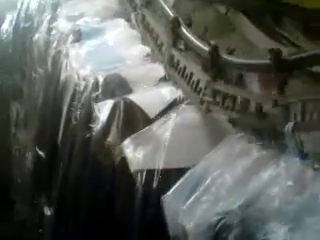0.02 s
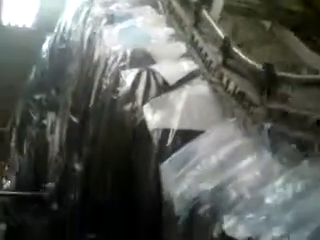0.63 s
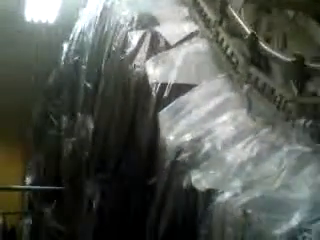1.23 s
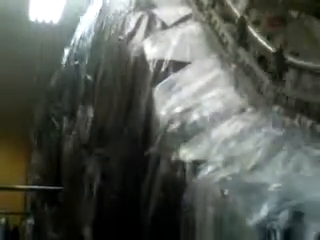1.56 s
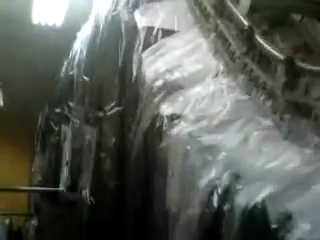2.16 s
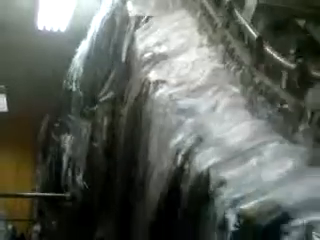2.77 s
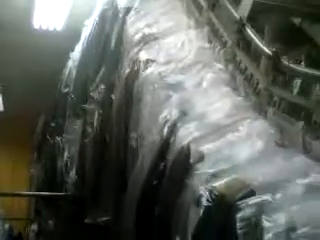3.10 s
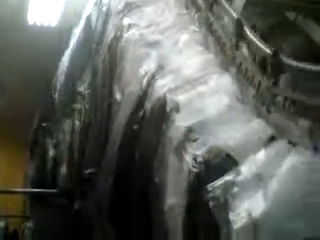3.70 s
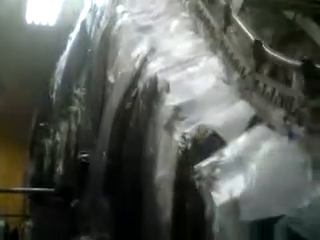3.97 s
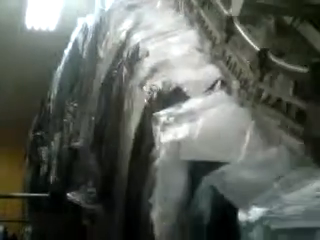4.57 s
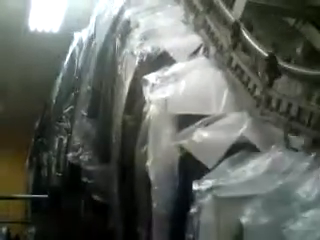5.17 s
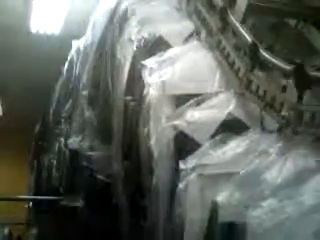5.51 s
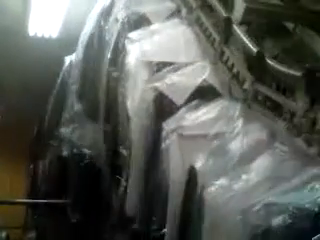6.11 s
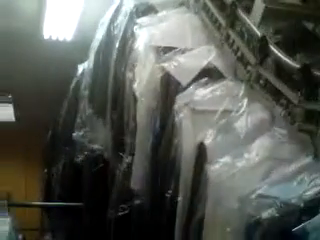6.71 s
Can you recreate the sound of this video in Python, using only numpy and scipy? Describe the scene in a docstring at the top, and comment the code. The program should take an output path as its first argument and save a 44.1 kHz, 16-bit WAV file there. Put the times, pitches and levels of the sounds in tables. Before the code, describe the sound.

A fan drones softly in a shop as the motor of a clothes conveyor kicks in with a brief squeal and clack. It settles into a steady low hum under the rumble and hiss of rollers, with recurring metal clatter, light hanger clicks and crinkling plastic covers, all with little echo. Late on, a sharp click comes, the motor cuts out and the rolling begins to fade.

```python
"""An overhead garment conveyor in a shop; a fan drones throughout. At 0.14 s the motor starts on a mains
hum; its drive slips with a short squeal and clacks. From 0.54 s rollers rumble, hiss and sing along the
rail, a chain joint clatters by every 0.7 s, hangers click and plastic covers rustle.
At 4.4 s the load eases. Near 6 s the motor is switched off and the chain coasts."""
import sys
import numpy as np
from scipy import signal
from scipy.fft import rfft, irfft, next_fast_len
from scipy.io import wavfile

SR = 44100
rng = np.random.default_rng(int(sys.argv[2]) if len(sys.argv) > 2 else 0)


def dump_mix(stems):
    """Bounce the given channels to the path in sys.argv[1] as a 16-bit WAV at rate SR."""
    frames = np.atleast_2d(stems).T  # one column per channel
    limited = np.clip(frames, -1, 1)  # hard clip at full scale
    pcm = np.round(limited * 32767).astype(np.int16)
    wavfile.write(sys.argv[1], SR, pcm)


N = 306054
TIME_S = np.arange(N) / SR
START_S, MOVING_S, EASE_S, OFF_S, COAST_S = 0.14, 0.54, 4.38, 6.02, 6.14

# fan drone: time_s, relative_db
FAN_LEVEL = [(0.0, -53), (0.11, -55.5), (0.135, -37.5), (0.33, -47.5), (0.58, -55), (0.89, -45),
             (1.41, -57.5), (2.55, -41.5), (3.01, -68), (3.09, -57), (3.36, -59), (3.86, -38.5),
             (4.56, -60), (4.62, -45.5), (5.97, -45.5), (6.57, -55), (6.78, -45.5), (6.94, -50)]
# mains hum: harmonic, relative_db
HUM_HARMONICS = [(1, 4), (2, -20), (3, -40.5)]
# brief dips of the hum: centre_s, gain_db, width_s
HUM_DIPS = [(0.345, -20, .02), (0.776, -4, 0.019), (1.13, -3.5, 0.067), (2.332, -1.5, .05),
            (2.596, -0.7, .18)]
# motor housing resonances: pitch_hz, width_hz, re_hum_db
HOUSING_MODES = [(107, 20, -17), (160, 32, -20.5), (274, 55, -25), (332, 10, -22.5), (460, 76, -33)]
# rustle of the covers: time_s, relative_db
RUSTLE_LEVEL = [(0.45, -50), (0.63, -48), (1.01, -44), (1.68, -43.5), (2.17, -45), (3.12, -45),
                (3.48, -46.5), (3.85, -45), (4.75, -46.5), (4.95, -48), (6.03, -45.5), (6.85, -61),
                (6.94, -61)]
# single crinkles: start_s, peak_db, pitch_hz
COVER_CRINKLES = [(.636, -32.5, 4600), (.941, -36, 5000), (1.387, -39, 5030), (1.421, -36, 5200),
                  (1.557, -23, 4600), (1.629, -24, 4850), (1.652, -27, 5400), (1.666, -24, 4500),
                  (1.678, -22, 4400), (1.773, -37, 4800), (1.79, -24, 4750), (1.8378, -23, 4700),
                  (3.372, -30.5, 5500), (3.461, -23, 5600), (4.975, -25, 4970)]
# low thumps, the first two as the motor kicks in, later ones from the swinging load: start_s, level_db
LOW_THUMPS = [(0.128, -42), (.2, -39.5), (5.629, -39.5), (5.924, -41), (5.965, -43), (6.749, -50)]
# hanger resonances: pitch_hz, relative_db
HANGER_MODES = [(1700, -1), (2050, -8.5), (2280, -7), (2420, -11), (2700, -4), (2950, -3.5), (3230, 0),
                (3390, -5.5), (3620, -1.5), (3810, -17.5), (4160, 5.5), (4570, -3), (4950, 3.5),
                (5300, -1.5), (5750, -2), (6200, 0.5), (6700, 4.5)]
# clicks of hangers, hooks, drive and chain joints: start_s, peak_db, pitch_hz, spread_octaves, t60_s
SHARP_CLICKS = [(0.023, -34.5, 3230, 0.11, .035), (.1245, -23.5, 2550, 0.2, 0.048),
                (0.3748, -16.5, 2220, 0.24, .037), (0.616, -30, 2040, 0.34, 0.033),
                (.764, -25.5, 2200, 0.56, 0.022), (.805, -30, 2330, 0.35, .03),
                (.866, -27.5, 2270, 0.17, .05), (.897, -29, 2400, .2, 0.064), (1.0, -21, 2200, 0.2, 0.075),
                (1.0975, -16, 3470, 0.49, 0.016), (1.164, -26, 3300, 0.22, 0.016),
                (1.2285, -25, 2980, 0.42, 0.01), (1.415, -24.5, 2170, 0.37, 0.054),
                (1.664, -20.5, 2210, 0.45, .025), (1.974, -33, 2680, 0.17, 0.046),
                (2.3755, -23, 2100, 0.55, 0.026), (2.465, -31, 2280, 0.12, 0.026),
                (3.799, -27, 2300, .15, 0.027), (4.724, -28, 1690, 0.52, 0.039),
                (5.2528, -27, 3220, 0.05, 0.042), (5.973, -13, 2950, 0.27, 0.033),
                (6.647, -30, 2220, 0.099, 0.024), (6.694, -35, 2630, 0.59, .03),
                (6.757, -23, 3504, 0.049, 0.033), (6.873, -37, 2060, 0.25, .04)]
# singing rollers: peak_s, level_db, length_s, pitch_hz, rough_share
ROLLER_GROANS = [(0.03, -47.5, 0.12, 1390, 0.06), (0.05, -49, 0.044, 2060, 0.2),
                 (0.8, -48.5, 0.34, 394, 0.2), (1.259, -40.5, 0.084, 442, 0.17),
                 (1.49, -43.5, 0.11, 1960, 0.2), (1.873, -42, 0.051, 1780, 0.3),
                 (2.216, -44, 0.09, 2240, 0.59), (2.252, -48, 0.3, 444, 0.1), (2.271, -42, 0.096, 1753, 0),
                 (2.636, -44, 0.06, 1720, 0.5), (2.736, -43, 0.13, 1774, 0.33),
                 (2.98, -45, 0.097, 1323, 0.7), (3.06, -39, 0.08, 1788, 0.3), (3.343, -45, 0.12, 1398, 0.4),
                 (3.662, -42.5, 0.14, 1746, 0.6), (3.793, -39, 0.13, 1800, 0.5),
                 (4.02, -46.5, 0.47, 441, 0.2), (4.268, -40.5, 0.17, 445, 0.12),
                 (4.269, -40, .06, 1765, .6), (5.162, -43, 0.027, 1286, 0.3), (5.65, -49, 0.098, 1400, 0.6),
                 (6.163, -40.5, 0.046, 1990, .7), (6.363, -49.5, 0.039, 1533, 0.2),
                 (6.435, -46, 0.073, 2030, 0.6), (6.81, -55.5, 0.21, 397, .2)]
# rail resonances: pitch_hz, width_hz, relative_db
RAIL_MODES = [(322, 39, -19), (701, 27, -20), (1060, 20, -28.5), (1302, 26, -17), (1460, 32, -28),
              (1552, 21, -16.5), (1762, 23, -17), (1977, 15, -14.5), (2114, 15, -15), (2387, 36, -17.5),
              (2610, 17, -18.5), (2872, 37, -24)]
# chain guide resonances: pitch_hz, relative_db, t60_s
GUIDE_MODES = [(733, -16, 0.27), (1086, -7, 0.12), (1382, -14.5, 0.12), (1482, -10, 0.089),
               (1750, -9, 0.23), (2127, -5.5, 0.088), (2467, -6, 0.055), (2854, -7.5, 0.035),
               (3630, -9.5, 0.049), (4080, -19, 0.061)]
# clatter of joints and drive: start_s, level_db, decay_s, tilt_db_per_octave
JOINT_HITS = [(0.124, -33, 0.065, -1.5), (0.371, -28, 0.02, 7), (0.952, -21, 0.0075, 6.5),
              (0.967, -26, 0.01, 6), (1.224, -30, 0.0043, 5.5), (1.666, -27.5, 0.016, 2.5),
              (1.686, -26.5, 0.013, 6.5), (1.769, -31, 0.035, 4.5), (2.344, -33.5, 0.033, -2),
              (2.374, -22.5, 0.012, 0), (3.08, -24.5, 0.022, 1.5), (3.796, -23.5, 0.018, 2.5),
              (4.47, -34.5, 0.023, 7.5), (4.513, -26, 0.014, 18), (4.53, -36, 0.017, 0),
              (5.211, -32.5, 0.03, 3.5), (5.864, -33, 0.032, 5.5), (5.921, -30.5, 0.025, -0.5),
              (6.689, -40, 0.038, 10)]
# drive pulley resonances: pitch_hz, relative_db, t60_s
PULLEY_MODES = [(1990, -15.5, 0.097), (2305, -14, .08), (2320, -11, .08), (2588, -13, 0.086),
                (2710, -12, 0.11), (2800, -15, 0.092), (3550, -13.5, 0.087), (4230, -22, .05),
                (4490, -19, 0.053), (5040, -20, .08)]
# slip rate, sagging as the drive grips: time_s, pitch_hz
SLIP_PITCH = [(.16, 758), (.185, 754), (.205, 754), (.222, 748), (.234, 739), (.255, 743), (.285, 731),
              (.32, 727)]
# squeal partials by stage: harmonic, first_db, octave_dropped_db, slowed_db
SLIP_HARMONICS = [(1, -42, -5, -4), (2, -3.5, -1.5, -2), (3, -45, -12.5, -8.5), (4, 2, 0.5, -15),
                  (5, -30.5, -5, -12), (6, -23, -10, -26), (7, -35, -17.5, -17), (8, -28, -18.5, -27.5)]
# noise spectra: frequency_hz, density_db
RUSTLE_SPECTRUM = [(2500, -3.5), (3500, -3), (4300, 3), (5200, 1), (6200, -0.5), (7200, -6.5)]
BUMP_SPECTRUM = [(180, 2), (340, 5.5), (500, -4), (700, -1), (1100, -27.5)]
RUMBLE_SPECTRUM = [(22, 2.5), (45, 2.5), (90, 2), (170, 1), (240, -3), (335, -4.5), (420, -3.5), (560, -12),
                   (800, -10.5), (1100, -10), (1600, -16.5)]
ROLLING_SPECTRUM = [(700, -28), (1100, -13), (1350, 0), (1600, -2), (2100, 2.5), (2700, 1.5), (3300, -0.5),
                    (3900, -8.5), (5000, -16.5)]
JOINT_SPECTRUM = [(150, 6.5), (350, 2.5), (700, -5.5), (1100, 1), (1600, 5), (2300, 5), (3200, -1),
                  (4500, -7.5), (7000, -18)]
RASP_SPECTRUM = [(200, -31.5), (600, -12), (1050, -10), (1350, -2.5), (1900, 1), (2700, 7.5), (3400, 1.5),
                 (4000, -1.5), (4500, -4.5), (5400, -10), (7000, -14.5)]


def from_db(db):
    """Decibels to gain."""
    return 10 ** (np.asarray(db) / 20)


def rms_one(x):
    """Scale to rms 1."""
    return x / np.sqrt(np.mean(x ** 2) + 1e-20)


def curve(rows):
    """Breakpoints interpolated to every sample."""
    return np.interp(TIME_S, *np.transpose(rows))


def ramp(start_s, length_s):
    """Linear rise from 0 to 1, then held."""
    return np.clip((TIME_S - start_s) / length_s, 0, 1)


def since(start_s):
    """Elapsed seconds; 0 before the start."""
    return np.maximum(TIME_S - start_s, 0)


def swell(peak_s, width_s):
    """Bell of height 1."""
    return np.exp(-((TIME_S - peak_s) / width_s) ** 2)


def drift(rate_hz):
    """Slow random wander; rms 1."""
    hop, settle = 40, 2000
    pole = np.exp(-2 * np.pi * rate_hz * hop / SR)
    noise = rng.standard_normal(N // hop + settle + 2)
    slow = signal.lfilter([1], [1, -2 * pole, pole * pole], noise)[settle:]
    return np.interp(np.arange(N) / hop, np.arange(len(slow)), rms_one(slow))


def colour(x, spectrum, tilt_db_per_octave=0):
    """Minimum-phase filter to a spectrum, with 24 dB/octave skirts; rms 1."""
    size = next_fast_len(len(x) + 4096) // 2 * 2
    octave = np.log2(np.maximum(np.fft.rfftfreq(size, 1 / SR), 1))
    hz, db = np.transpose(spectrum)
    outside = np.abs(octave - np.clip(octave, np.log2(hz[0]), np.log2(hz[-1])))
    shape_db = np.interp(octave, np.log2(hz), db) + tilt_db_per_octave * octave - 24 * outside
    cepstrum = irfft(np.log(from_db(shape_db - shape_db.max())))
    response = np.exp(2 * rfft(cepstrum[:size // 2], size))
    return rms_one(irfft(rfft(x, size) * response, size)[:len(x)])


def ring(x, hz, t60_s):
    """Two-pole resonator set by decay time; rms 1."""
    radius, angle = from_db(-60 / (t60_s * SR)), 2 * np.pi * hz / SR
    feedback = [1, -2 * radius * np.cos(angle), radius * radius]
    return rms_one(signal.lfilter([0, np.sin(angle)], feedback, x + 1e-18))


def resonate(x, hz, width_hz):
    """Resonator set by bandwidth; rms 1."""
    return ring(x, hz, np.log(1000) / np.pi / width_hz)


def grains(per_s, spread_db, size=N):
    """Tiny random contacts of uneven strength; rms 1."""
    strength = from_db(spread_db * np.minimum(rng.exponential(1, size), 4))
    polarity = rng.choice([-1, 1], size)
    return rms_one(strength * polarity * (rng.random(size) < per_s / SR))


def add(out, start_s, sound):
    """Mix a sound in at a time."""
    at = max(round(start_s * SR), 0)
    out[at:at + len(sound)] += sound[:N - at]


def load(slack_share=0.4, take_up_s=0.88, easing_s=0.035):
    """Pull on the drive, 0-1: builds as the chain tightens, then drops away."""
    tension = 1 - slack_share * np.exp(-since(START_S) / take_up_s)
    return tension * (1 - ramp(EASE_S, easing_s))


def chain_db(idle_db=-45, eased_db=-44.5, load_db=3.5, coast_db_per_s=9.5, carrier_period_s=0.32):
    """Base level of the chain: follows the load, swells with each carrier, sinks while coasting."""
    carrier_db = np.cos(2 * np.pi * (TIME_S - 0.95) / carrier_period_s)
    running_db = eased_db + load_db * load() - coast_db_per_s * since(COAST_S) + carrier_db
    return idle_db + (running_db - idle_db) * ramp(MOVING_S, length_s=0.083)


def contact_db(lull_db=2):
    """Chain level with a brief lull as it slackens."""
    return chain_db() - lull_db * swell(peak_s=4.29, width_s=0.17)


def shop(x, t60_s=0.16, tail_db=-8):
    """Dense wall and ceiling reflections, soon absorbed by the clothes."""
    t = TIME_S[:SR // 2]
    tail = rng.standard_normal(len(t)) * from_db(-60 * t / t60_s) * (t > 0.002)
    return x + from_db(tail_db) * signal.fftconvolve(x, tail / np.linalg.norm(tail))[:N]


def fan(pitch_hz=70, gain_db=-2, waver_rad=0.22):
    """Low, unsteady drone."""
    phase = 2 * np.pi * pitch_hz * TIME_S + waver_rad * drift(3.5)
    return from_db(curve(FAN_LEVEL) + gain_db) * rms_one(np.sin(phase))


def motor(hum_hz=119.96, eased_db=-39, load_db=8.5, waver_rad=0.04, release_s=0.024):
    """Magnetic mains hum, louder under load; the gears make the housing growl."""
    phase = 2 * np.pi * hum_hz * TIME_S + waver_rad * drift(9)
    hum = rms_one(sum(from_db(db) * np.sin(k * phase) for k, db in HUM_HARMONICS))
    growl = sum(from_db(db) * resonate(rng.standard_normal(N), hz, width_hz)
                for hz, width_hz, db in HOUSING_MODES)
    powered = ramp(START_S, length_s=0.047) * np.exp(-since(OFF_S) / release_s)
    inrush_db = 7 * swell(peak_s=0.198, width_s=0.0082)
    dips_db = sum(db * swell(centre_s, width_s) for centre_s, db, width_s in HUM_DIPS)
    level_db = eased_db + load_db * load() + inrush_db + dips_db + 1.23 * drift(8.8)
    return powered * from_db(level_db) * (hum + growl)


def rustle(gain_db=-1.63, clump_db=1.5):
    """Plastic covers crinkle in clumps."""
    level_db = curve(RUSTLE_LEVEL) + gain_db + clump_db * np.tanh(drift(30))
    return from_db(level_db) * colour(grains(per_s=2800, spread_db=-4.5), RUSTLE_SPECTRUM)


def crinkles(decay_s=0.004):
    """A fold of plastic buckles in a quick run of bright snaps."""
    out, t = np.zeros(N), TIME_S[:SR // 20]
    for start_s, peak_db, hz in COVER_CRINKLES:
        burst = grains(per_s=5800, spread_db=4.5, size=len(t)) * np.exp(-t / decay_s)
        snaps = colour(burst, [(hz / 2, -20), (hz, 0), (hz * np.sqrt(2), -9)])
        add(out, start_s, from_db(peak_db) * snaps / np.abs(snaps).max())
    return out


def bumps(rise_s=0.0023, decay_s=0.077):
    """Low thumps: the motor kicks as it starts; later, heavy garments tug at the frame."""
    out, t = np.zeros(N), TIME_S[:SR // 3]
    envelope = (1 - np.exp(-t / rise_s)) * np.exp(-t / decay_s)
    for start_s, db in LOW_THUMPS:
        add(out, start_s, from_db(db) * envelope * colour(rng.standard_normal(len(t)), BUMP_SPECTRUM))
    return out


def knock(pitch_hz, spread_octaves, t60_s, contact_s=0.0011):
    """Brief chatter rings the hanger modes near a pitch; peak 1."""
    t = TIME_S[:SR // 10]
    contact = colour(rng.standard_normal(len(t)) * np.exp(-t / contact_s), [(1500, 0), (7000, 0)])
    sound = np.zeros(len(t))
    for k, (hz, db) in enumerate(HANGER_MODES):
        detuning = np.log2(hz / pitch_hz) / spread_octaves
        sound += (-1) ** k * from_db(db) / (1 + detuning ** 2) * ring(contact, hz, t60_s)
    return sound / np.abs(sound).max()


def hooks(count=140, above_chain_db=5, scatter_db=-6):
    """Hooks clink faintly in their slots, following the chain's level."""
    out, base_db = np.zeros(N), chain_db() + above_chain_db
    for when, pitch, softness in rng.random((count, 3)):
        at = int(when * N)
        clink = knock(pitch_hz=1850 + 1350 * pitch, spread_octaves=0.073, t60_s=0.06)
        add(out, at / SR, from_db(base_db[at] + scatter_db * softness) * clink)
    return out


def clicks():
    """Sharp clicks: hangers, hooks, and the first snap of drive and chain-joint clacks."""
    out = np.zeros(N)
    for start_s, peak_db, pitch_hz, spread_octaves, t60_s in SHARP_CLICKS:
        add(out, start_s, from_db(peak_db) * knock(pitch_hz, spread_octaves, t60_s))
    return out


def groans(rub_hz=75):
    """Dry rollers sing briefly: part clean tone, part rough rubbing."""
    out = np.zeros(N)
    rub = (drift(rub_hz) + 1j * drift(rub_hz)) / np.sqrt(2)
    for peak_s, db, length_s, hz, rough_share in ROLLER_GROANS:
        near = np.abs(TIME_S - peak_s) < 2 * length_s
        modulation = np.sqrt(1 - rough_share) + np.sqrt(rough_share) * rub[near]
        voice = np.sqrt(2) * np.real(modulation * np.exp(2j * np.pi * hz * TIME_S[near]))
        out[near] += from_db(db) * swell(peak_s, length_s / 2)[near] * voice
    return out


def rumble(gain_db=-2.5, rest_db=-7):
    """Rollers shake the rail; the low noise is weaker before the start."""
    resting = 1 - ramp(START_S, length_s=0.023)
    level_db = chain_db() + gain_db + rest_db * resting + drift(14)
    return from_db(level_db) * colour(rng.standard_normal(N), RUMBLE_SPECTRUM)


def rolling(gain_db=-0.8):
    """Countless roller contacts hiss, brighter under load."""
    contacts, pull = grains(per_s=3000, spread_db=-1), load()
    taut = colour(contacts, ROLLING_SPECTRUM)
    slack = colour(contacts, ROLLING_SPECTRUM, tilt_db_per_octave=-4)
    return from_db(contact_db() + gain_db + drift(35)) * (pull * taut + (1 - pull) * slack)


def rail(slack_db=1, swell_db=7, uneven_db=4):
    """Loose links tap the rail; each resonance swells at random as rollers pass."""
    out, base_db = np.zeros(N), contact_db() + slack_db * (1 - load())
    taps = grains(per_s=70, spread_db=0)
    for hz, width_hz, db in RAIL_MODES:
        level_db = base_db + db + swell_db * np.tanh(drift(9.7))
        strength = from_db(uneven_db * np.tanh(drift(53)))
        out += from_db(level_db) * resonate(taps * strength, hz, width_hz)
    return out


def clatter(rise_s=0.0024, ring_db=-1, uneven_db=4.5):
    """A joint rides over the guide: a dying burst of metal contacts rings it."""
    out, t = np.zeros(N), TIME_S[:SR // 3]
    for start_s, db, decay_s, tilt in JOINT_HITS:
        envelope = (1 - np.exp(-t / rise_s)) * np.exp(-t / decay_s)
        contacts = grains(per_s=1500, spread_db=0.5, size=len(t)) * envelope
        hit = colour(contacts, JOINT_SPECTRUM, tilt)
        for hz, mode_db, t60_s in GUIDE_MODES:
            scatter_db = uneven_db * rng.uniform(-1.5, 0.5)
            gain = from_db(mode_db + ring_db - tilt + scatter_db)  # brighter hits ring less
            hit += gain * ring(contacts, hz, t60_s)
        add(out, start_s, from_db(db) * np.sqrt(np.mean(envelope ** 2)) * rms_one(hit))
    return out


def squeal_gate_db(rise_db_per_s, fall_db_per_s, full_s=0.18, grip_s=0.31):
    """Rises to 0 dB, holds, falls once the drive grips."""
    early_s, late_s = np.maximum(full_s - TIME_S, 0), np.minimum(since(grip_s), 1)
    return -rise_db_per_s * early_s - fall_db_per_s * late_s


def rasp(slip_phase, dropped, base_db=-25, growth_db=1, shudder_db=3, slip_depth=0.74):
    """Each slip of the drive sheds a noise pulse that rings the pulley."""
    gate_db = squeal_gate_db(rise_db_per_s=423.5, fall_db_per_s=330.5)
    envelope = from_db(base_db + gate_db + growth_db * dropped + shudder_db * drift(73))
    slips = envelope * rng.standard_normal(N) * (1 + slip_depth * np.cos(slip_phase))
    pulley = sum(from_db(db) * ring(slips, hz, t60_s) for hz, db, t60_s in PULLEY_MODES)
    return np.sqrt(np.mean(envelope ** 2)) * rms_one(colour(slips, RASP_SPECTRUM) + pulley)


def squeal(base_db=-20.5, drop_s=0.22, slowing_s=0.268, change_s=0.015, jitter=0.004, flutter_db=2.3):
    """Rasping stick-slip tone: stumbles as the load takes hold, drops an octave as odd partials join."""
    dropped, slowed = ramp(drop_s, change_s), ramp(slowing_s, change_s)
    pitch_hz = curve(SLIP_PITCH) * (1 + jitter * drift(290))
    phase = 2 * np.pi * np.cumsum(pitch_hz) / SR
    stumble_db = -9 * swell(drop_s + change_s / 2, change_s / 2)
    tone_db = base_db + stumble_db + squeal_gate_db(rise_db_per_s=850, fall_db_per_s=722)
    tone = np.zeros(N)
    for k, *stages_db in SLIP_HARMONICS:
        level_db = tone_db + np.interp(dropped + slowed, [0, 1, 2], stages_db) + flutter_db * drift(190)
        frame_delay_rad = 2 * np.pi * rng.random()
        tone += np.sqrt(2) * from_db(level_db) * np.sin(k * phase + frame_delay_rad)
    return tone + rasp(phase, dropped)


def scene():
    """Mono mix; only the knocks echo in the shop."""
    knocks = shop(clatter() + bumps() + clicks() + hooks() + crinkles())
    sustained = squeal() + motor() + fan() + rumble() + rolling() + rail() + rustle() + groans()
    return (knocks + sustained)[None]


def record(dry, notch_hz=3966, notch_width_hz=91, cutoff_hz=7200):
    """Band-limited sound: a narrow dip near 4 kHz and a steep top cut."""
    notched = signal.lfilter(*signal.iirnotch(notch_hz, notch_hz / notch_width_hz, fs=SR), dry)
    return signal.sosfilt(signal.ellip(10, 0.3, 80, cutoff_hz, fs=SR, output="sos"), notched)


dry = scene()
out = record(dry)
dump_mix(out)
```